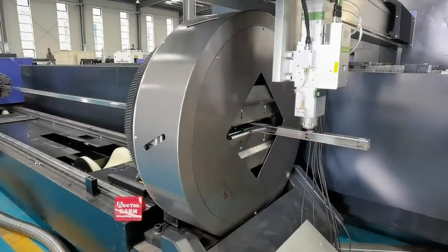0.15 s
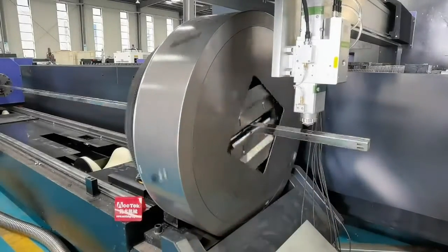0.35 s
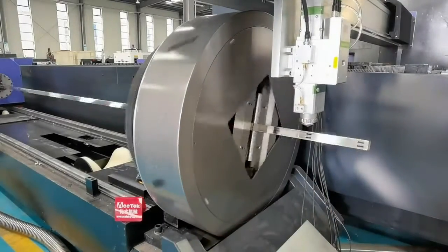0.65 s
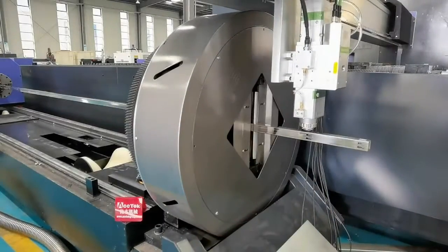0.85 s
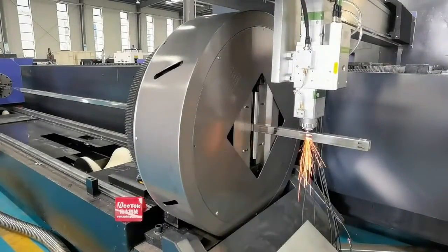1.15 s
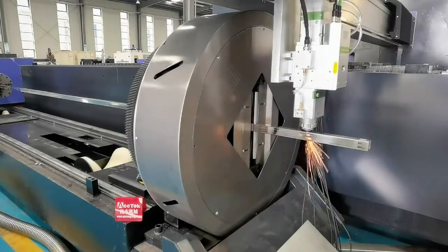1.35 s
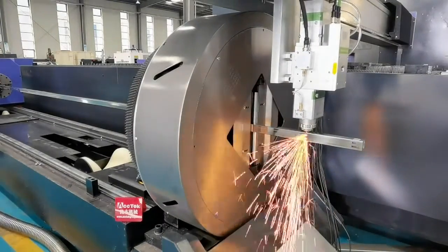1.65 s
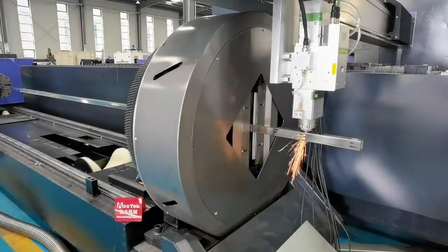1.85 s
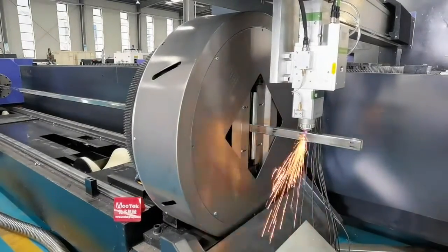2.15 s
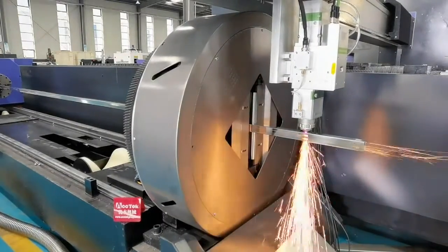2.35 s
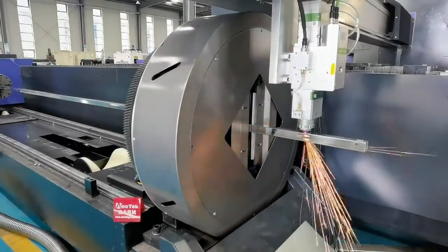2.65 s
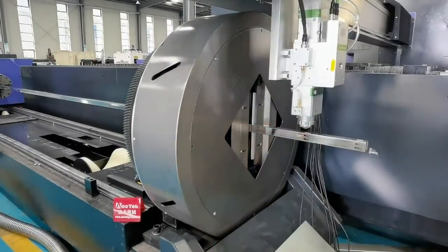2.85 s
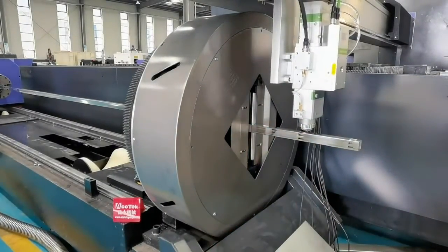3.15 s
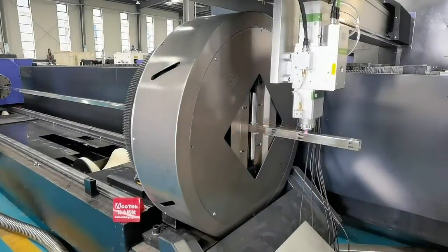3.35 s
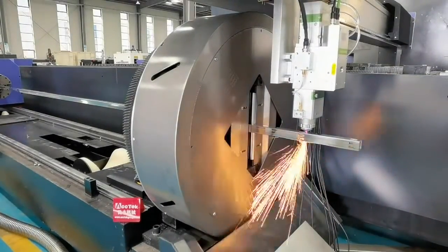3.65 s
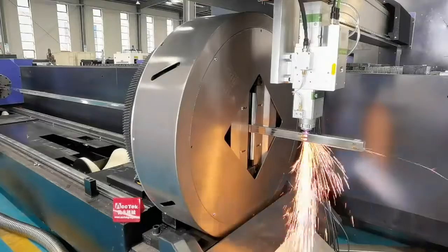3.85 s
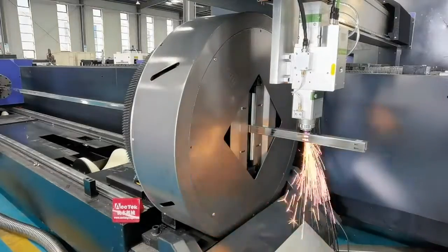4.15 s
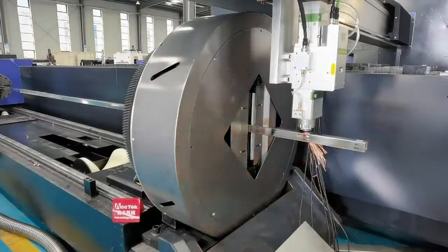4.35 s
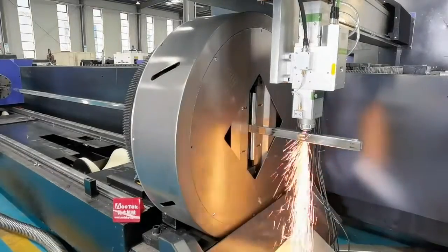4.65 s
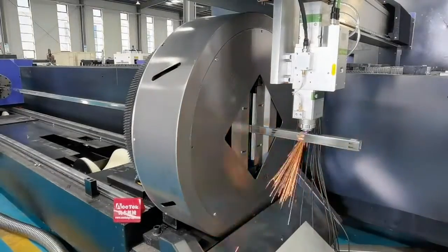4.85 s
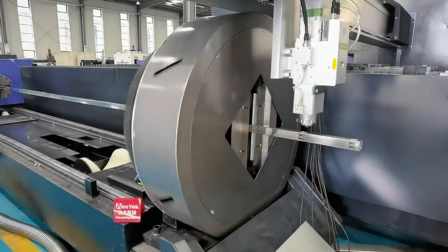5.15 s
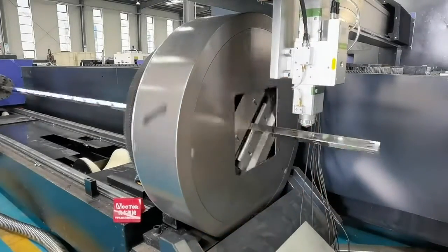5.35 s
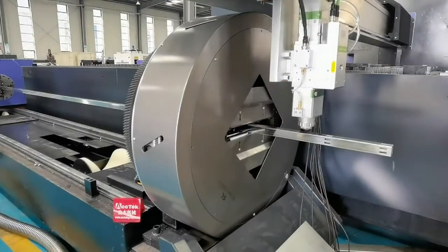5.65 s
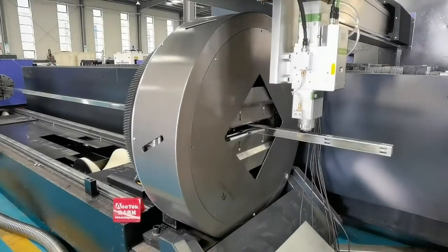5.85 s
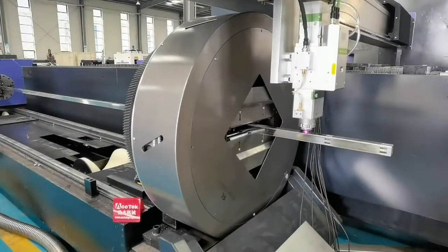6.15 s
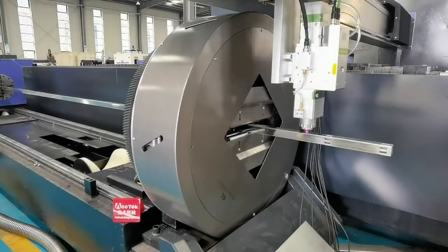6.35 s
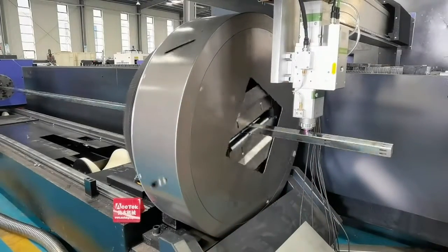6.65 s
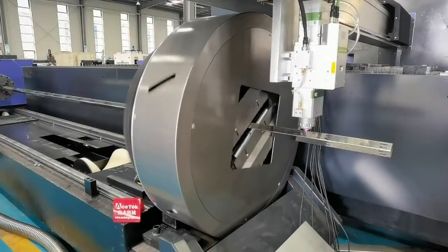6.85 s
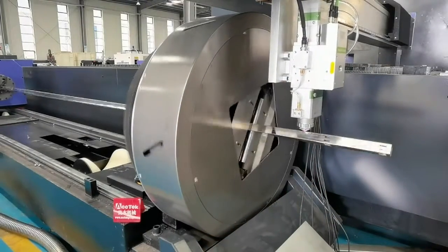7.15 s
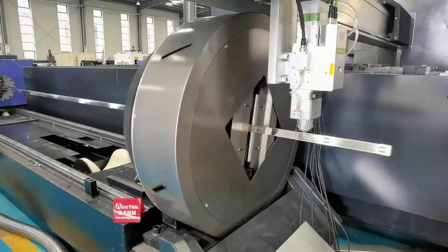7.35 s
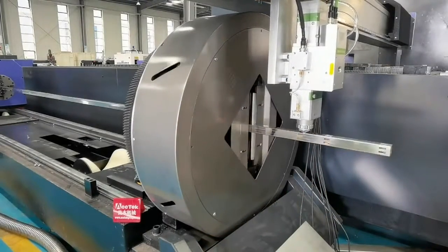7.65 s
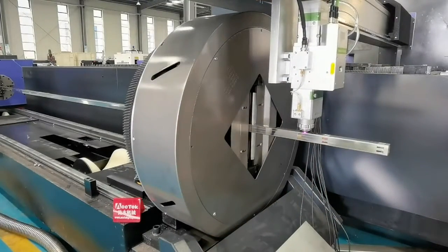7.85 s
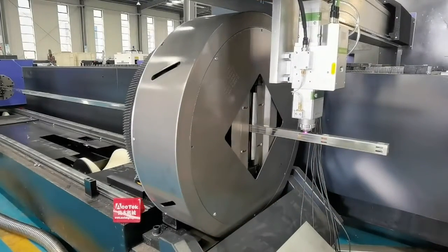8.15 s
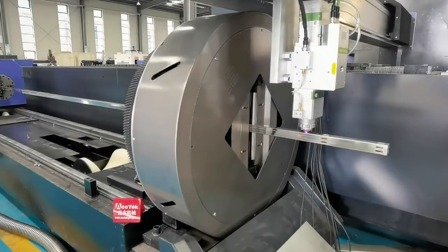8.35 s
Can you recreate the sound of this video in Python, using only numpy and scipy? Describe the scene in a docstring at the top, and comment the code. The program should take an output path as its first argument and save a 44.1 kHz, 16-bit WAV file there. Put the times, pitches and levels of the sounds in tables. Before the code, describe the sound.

A bright, forceful gas jet hisses near the microphone, with a thin whistle around 8 kHz, fine spark crackle and faint hollow tube resonance. From 0.1 to 0.6 seconds it flares harshly; a low drive hum around 130 Hz follows until about 0.9, when the gas chokes and returns with a soft knock. Small spurts come at 1.1 and 2.0. A stronger blast bursts at 2.7-3.0, then a short dip near 3.1. Rushing cutting noise continues from 3.5 to 4.9, with another sharp blast at 5.0-5.3. The drive hums at 5.3-5.7, the gas drops, knocks back at 5.8, dips again and spurts at 6.1. Steadier hiss follows over gear rumble, fluttering rapidly around 6.7-7.4 with quieter hums. A brief edge change comes at 7.5, then faint servo notes under the hiss until 8.5. The hall's low fan drone stays beneath.

```python
"""Laser cutting a steel tube

Assist gas hisses from the nozzle, flares and changes colour on edges and slots, whistles in the nozzle gap
and blows the hollow tube into resonance: coloured noise under level curves, with sparks as random clicks.
Between cuts the gas valve knocks (decaying noise in frame resonances) and the chuck's drive hums (harmonics)
as it turns the tube. Gears rumble, a drive sings late on, and the hall drones with a fan tone."""
import sys
import numpy as np
from scipy import signal
from scipy.fft import rfft, irfft, next_fast_len
from scipy.io import wavfile
from scipy.ndimage import uniform_filter1d, map_coordinates

SR = 44100
rng = np.random.default_rng(int(sys.argv[2]) if len(sys.argv) > 2 else 0)


def store_pcm(level_fs):
    """Save levels as 16-bit WAV."""
    pcm = np.round(np.clip(level_fs, -1, 1) * 32767).astype(np.int16)
    wavfile.write(sys.argv[1], SR, np.atleast_2d(pcm).T)


N = 374409

# spectrum of the free jet's hiss: f/Hz, density/dB
HISS_SPECTRUM = [(60, -90), (900, -39), (3500, -32), (4700, -17), (5400, -2), (5800, .5), (6300, 0),
                 (6750, 0.5), (7200, 3), (9000, 5), (9400, -2.5), (10000, 1), (10900, -2.5), (11600, -16.5),
                 (14000, -21)]
# spectrum of the rush on the cut edge: f/Hz, density/dB
EDGE_SPECTRUM = [(50, -72), (200, -30.5), (600, -24.5), (1000, -18), (1850, -13), (2200, -6.5),
                 (3000, -3.5), (3550, 0), (4050, -2.5), (4900, 2), (5400, 0.5), (6400, 0.5), (8000, -2),
                 (12000, -28)]
# resonances of the nozzle gap: f/Hz, width/Hz, level/dB
GAP_MODES = [(8366, 380, 18), (8660, 380, 5)]
TUBE_LEFT_S = 5.4  # the nozzle leaves the tube's opening
TUBE_LAG_S = 0.00005  # left-right lag of the tube's sound


def amp(db):
    """Decibels to gain."""
    return np.exp(np.log(10) / 20 * np.asarray(db))


def unit(x):
    """Scale to rms 1."""
    return x / np.sqrt(np.mean(x ** 2) + 1e-20)


def along(points, hz):
    """Interpolate (f/Hz, value) points on a log-frequency axis."""
    f, v = np.transpose(points)
    return np.interp(np.log(hz + 1), np.log(f + 1), v)


def clock():
    """Time of every sample in s."""
    return np.arange(N) / SR


def curves(rows):
    """One value per sample for each column after the time."""
    s, *columns = np.transpose(rows)
    return [np.interp(clock(), s, column) for column in columns]


def wobble(knots_per_s):
    """Smooth random curve: spline through normal random knots."""
    s = np.arange(0, N / SR, 1 / 2000)
    knots = rng.standard_normal(int(N * knots_per_s / SR) + 4)
    return np.interp(clock(), s, map_coordinates(knots, [s * knots_per_s]))


def gate(start, end, rise=.03, fall=.03):
    """Envelope of 1 between start and end, with straight ramps (s) centred on both."""
    opening = np.clip((clock() - start) / rise + .5, 0, 1)
    closing = np.clip((end - clock()) / fall + .5, 0, 1)
    return opening * closing


def burst(s, t60):
    """Envelope that rises within a millisecond at s and decays 60 dB per t60 (s)."""
    age = np.clip(clock() - s, 0, 1)
    decay = amp(np.maximum(-60 * age / t60, -160))
    return np.minimum(age / .001, 1) * decay


def filtered(x, response):
    """Apply a response of frequency to x."""
    m = next_fast_len(N + SR // 4)
    return irfft(rfft(x, m) * response(np.fft.rfftfreq(m, 1 / SR)), m)[..., :N]


def colour(points):
    """Response of a (f/Hz, level/dB) spectrum."""
    return lambda hz: amp(along(points, hz))


def resonances(modes, skirt=1.49):
    """Response of separately excited resonances, summed in power; skirt sets their steepness."""
    def response(hz):
        power = sum(amp(db) ** 2 / (1 + (2 * (hz - centre) / width) ** 2) ** skirt
                    for centre, width, db in modes)
        return np.sqrt(power)
    return response


def rush(response, lag_s=0.00019):
    """Stereo noise of rms 1; its shared part reaches the left microphone lag_s earlier."""
    # likeness of the two microphones: f/Hz, shared power/1
    likeness = [(60, 1), (300, 0.9), (700, 0.77), (1000, 0.5), (2300, 0.56), (4000, 0.42), (8000, 0.15),
                (15000, 0.1)]
    # balance of the two microphones: f/Hz, left minus right/dB
    balance = [(100, -3), (1500, -2), (2400, -6), (3000, -1), (3700, -2), (4500, 5.5), (5600, -7),
               (6700, 2.5), (7400, -1.5), (8350, 13.5), (9200, -2), (10400, 17), (12000, 2.5), (15000, 8.5)]
    m = 2 * next_fast_len(N // 2 + 1)
    hz = np.fft.rfftfreq(m, 1 / SR)
    noise = rng.standard_normal((3, 2 * len(hz))).view(complex)
    sides = np.array([[.5], [-.5]])
    alike = np.clip(along(likeness, hz), 0, 1)
    shared = np.sqrt(alike) * noise[0] * np.exp(2j * np.pi * hz * lag_s * sides)
    pair = shared + np.sqrt(1 - alike) * noise[1:]
    lean = amp(along(balance, hz) * sides)
    lean /= np.linalg.norm(lean, axis=0)  # same total power at every frequency
    return unit(irfft(pair * (lean * response(hz)), m)[:, :N])


def tone(hz, drift=0.00636, waver_db=2.5):
    """Machine tone of rms 1, slightly unsteady in pitch and level."""
    phase = 2 * np.pi * np.cumsum(hz * (1 + drift * wobble(10))) / SR
    return unit(amp(waver_db * wobble(8)) * np.sin(phase))


def panels(x, echo_db=-5.5, decay_s=0.0056, dull_hz=9000, count=120):
    """The machine's steel panels add a short cluster of dulled echoes, different at each microphone."""
    out = np.zeros_like(x)
    lowpass = signal.butter(1, min(dull_hz, SR / 3), fs=SR)
    for side in range(2):
        delays_s = rng.uniform(.0018, .028, count)
        strengths = rng.choice([-1, 1], count) * np.exp(-delays_s / decay_s)
        echoes = np.bincount((delays_s * SR).astype(int), strengths)
        response = signal.lfilter(*lowpass, amp(echo_db) * echoes / np.linalg.norm(echoes))
        response[0] = 1  # direct sound
        out[side] = signal.oaconvolve(x[side], response / np.linalg.norm(response))[:N]
    return out


def shimmer(x, patchy_db=1.6, band_size=3, frame_size=18):
    """Slowly shifting random narrow-band ripple in the noise's colour; sizes in bins, frames."""
    z = signal.stft(x, nperseg=512)[2]
    field = uniform_filter1d(rng.standard_normal(z.shape[1:]), band_size, 0)
    field = uniform_filter1d(field, frame_size, 1)
    rippled = signal.istft(z * amp(patchy_db * unit(field)), nperseg=512)[1][:, :N]
    return unit(rippled) * np.std(x)


def gas():
    """One jet drives hiss, edge rush with sparks, sizzle, gap whistle and the tube's air column."""
    # slow course of the jet: t/s, strength/dB, edge rush relative to it/dB
    jet_course = [(0, -16, -10.5), (0.42, -20.5, -10.5), (0.72, -24, -9.5), (1.05, -22.5, -10),
                  (1.4, -23, -6), (1.87, -20.5, -7.5), (2.25, -22, -10.5), (2.55, -20.5, -8.5),
                  (3.35, -16.5, -12), (3.62, -19.5, -7), (3.9, -16, -8), (4.55, -15.5, -14),
                  (4.87, -17.5, -13), (5.45, -18.5, -9), (6, -18, -18), (6.5, -18, -12), (7.4, -17.5, -13),
                  (8.49, -18.5, -12)]
    # sizzle spectrum: f/Hz, density/dB
    sizzle_spectrum = [(100, -84), (4000, -15), (8000, 9), (11000, 3.5), (12000, 1), (13500, 0.5),
                       (15200, 2), (16000, 0)]
    # air column of the tube: f/Hz, width/Hz, level/dB
    tube_modes = [(2200, 300, -4), (2504, 350, -4), (3400, 190, -8.5)]
    hiss_re_jet_db, edge_offset_db, whistle_re_jet_db = -5, -1, -7.5
    sizzle_base_db, sizzle_db_per_jet_db = -20, .45
    tube_base_db, tube_db_per_edge_db, tube_left_db = -25, 0.52, -12.5
    away_whistle_db, away_sizzle_db = -2, 0.5  # changes away from the tube's opening

    jet_db, on_edge_db = curves(jet_course)
    hiss_flare_db, edge_flare_db, whistle_flare_db, sizzle_flare_db = flares()
    supply_db = throttle() + flutter()
    flow_db = jet_db + supply_db
    edge_db = flow_db + on_edge_db + edge_flare_db
    away = gate(TUBE_LEFT_S, np.inf, rise=0.3)

    hiss_db = hiss_re_jet_db + flow_db + hiss_flare_db + 0.18 * wobble(30)
    rush_db = edge_offset_db + edge_db + 0.94 * wobble(70)
    sizzle_db = sizzle_base_db + sizzle_db_per_jet_db * jet_db + supply_db + sizzle_flare_db
    sizzle_db = sizzle_db + away_sizzle_db * away
    whistle_db = whistle_re_jet_db + flow_db + whistle_flare_db
    whistle_db = whistle_db + away_whistle_db * away + 0.36 * wobble(25)
    tube_db = tube_base_db + tube_db_per_edge_db * edge_db + tube_left_db * away + 1.6 * wobble(13)

    hiss = amp(hiss_db) * rush(colour(HISS_SPECTRUM))
    edge = amp(rush_db) * rush(colour(EDGE_SPECTRUM))
    sizzle = amp(sizzle_db) * rush(colour(sizzle_spectrum))
    whistle = amp(whistle_db) * rush(resonances(GAP_MODES))
    tube = amp(tube_db) * rush(resonances(tube_modes), lag_s=TUBE_LAG_S)
    return hiss + edge + sizzle + whistle + tube + sparks(edge_db)


def flutter():
    """Gas gain in dB: runs of dips as the nozzle hunts for its height, over quick turbulence."""
    # runs of dips: first dip t/s, last dip t/s, period/s, depth/dB
    dip_runs = [(6.68, 6.955, 0.0538, -4), (7.193, 7.4, 0.068, -4.5)]
    dip_s = 0.014  # half width at 1/e of the depth
    t = clock()
    db = 0.38 * wobble(45) + .5 * wobble(260) + 0.48 * wobble(9)
    for first, last, period, depth_db in dip_runs:
        on = (t > first - period / 2) & (t < last + period / 2)
        offset = (t[on] - first + period / 2) % period - period / 2
        db[on] += depth_db * np.exp(-(offset / dip_s) ** 2)
    return db


def sparks(edge_db, per_second=300, spark_db=-9):
    """Droplets blown off the cut edge make tiny cracks, stronger as the edge rush grows."""
    hits = rng.random(N) < per_second / SR
    sizes = rng.uniform(-1.03, 1, (2, N))
    crack_colour = lambda hz: colour(HISS_SPECTRUM)(hz) + colour(EDGE_SPECTRUM)(hz)
    return unit(filtered(hits * sizes, crack_colour)) * amp(edge_db + spark_db)


def flares():
    """Gain in dB of hiss, edge, whistle, sizzle as the jet spills over edges; it never falls below 0."""
    # flares: start/s, end/s, release/s, hiss/dB, edge/dB, whistle/dB, sizzle/dB
    blasts = [(0.129, 0.442, 0.079, 7, 8.5, 5, 5.5), (0.42, 0.635, 0.056, 3, 6, 9.5, 10.5),
              (0.714, 0.847, 0.077, -3, -1, 3, 5), (1.916, 2.2, .08, 3, -0.5, 8.5, 0),
              (2.731, 3.03, 0.27, 8, 8.5, 6.5, 6), (4.992, 5.332, .16, 6.5, 5.5, 3.5, 3),
              (5.117, 5.254, 0.085, 6.3, 10.5, 6.5, 7), (5.28, 5.62, .1, -1, 1.5, 2, 1.5),
              (7.457, 7.714, .02, -0.9, 3, -2, -4)]
    attack_s = .014
    sag_db_per_s, brighten_db_per_s = 4, 15  # hiss and edge sink, sizzle grows
    slopes = [-sag_db_per_s, -sag_db_per_s, 0, brighten_db_per_s]
    gains = np.zeros((4, N))
    for start, end, release, *levels in blasts:
        envelope = gate(start, end, rise=attack_s, fall=release)
        on = envelope > 0
        drift = np.outer(slopes, clock()[on] - start)
        flare_db = envelope[on] * (np.array(levels)[:, None] + drift)
        gains[:, on] = np.maximum(gains[:, on], flare_db)
    return gains


def throttle():
    """Gas supply gain in dB: bleeds away between cuts, jumps back as the valve reopens, then refills."""
    # throttlings: start/s, reopening/s, depth/dB
    chokes = [(0.787, 0.923, -16.5), (3.08, 3.18, -5), (5.652, 5.801, -15), (6.037, 6.292, -7.5)]
    refill_share, refill_s = 0.51, 0.071  # part of the dB drop left at reopening, its time constant
    t, db = clock(), np.zeros(N)
    for start, reopen, depth_db in chokes:
        bleed = np.clip((t - start) / (reopen - start), 0, 1) ** 1.2
        refill = refill_share * np.exp(-np.minimum(np.abs(t - reopen) / refill_s, 20))
        db += depth_db * np.where(t < reopen, bleed, refill)
    return db


def hoot():
    """The tube's bore sounds like a blown pipe, wavering, whenever gas enters it: narrow-band noise."""
    # bore resonance: f/Hz, width/Hz, level/dB
    bore_modes = [(1186, 62, 0)]
    # gas entering the bore: start/s, end/s, level/dB
    hoots = [(-0.2, 5.42, -49.5), (0.18, 0.6, -45.5), (2.45, 2.87, -45.5), (3.53, 3.72, -44.5),
             (5.08, 5.4, -48), (5.85, 6.33, -56)]
    power = sum((amp(db) * gate(start, end, rise=.09, fall=0.055)) ** 2 for start, end, db in hoots)
    return np.sqrt(power) * amp(1.2 * wobble(12)) * rush(resonances(bore_modes), lag_s=TUBE_LAG_S)


def chuck(gear_db=-3.5, rough_db=2.4):
    """Gears of feed axis and chuck rumble as noise; the drive hums in unsteady harmonics during turns."""
    # feed axis pushing the tube forward: start/s, end/s, level/dB
    feeds = [(-0.2, 1.32, -63.5), (2.93, 3.3, -61), (5.75, 8.7, -57.5)]
    # turns: start/s, end/s, drive pitch f/Hz, level/dB, overtones/dB
    turns = [(0.361, 0.843, 133, -53, -0.5), (5.253, 5.692, 132.7, -48, 0), (6.722, 7.162, 112, -60.5, -16),
             (7.269, 7.437, 112.8, -54, -15)]
    # drive harmonics: multiple/1, level/dB
    harmonics = [(1, 0.5), (2, -10.5), (3, -5.5), (4, -8), (5, -11), (6, -7.5)]
    # gear rumble spectrum: f/Hz, density/dB
    gear_spectrum = [(25, -35), (60, -16), (90, -4.5), (125, 2.5), (185, 0), (260, -8.5), (400, -11),
                     (900, -10.5), (3000, -70)]
    hum = np.zeros(N)
    effort = sum(amp(db) * gate(start, end, rise=.12, fall=.12) for start, end, db in feeds)
    speed = 1 + 0.0108 * wobble(40)
    strengths = [amp(level + rough_db * wobble(45)) for _, level in harmonics]
    for start, end, hz, db, overtone_db in turns:
        envelope = amp(db) * gate(start, end, rise=.04, fall=0.23)
        on = envelope > 0
        phase = 2 * np.pi * np.cumsum(hz * speed[on]) / SR
        for order, (multiple, _) in enumerate(harmonics):
            partial = np.sqrt(2) * np.sin(round(multiple) * phase + rng.uniform(0, 2 * np.pi))
            strength = strengths[order][on] * amp(overtone_db * (order > 0))
            hum[on] += envelope[on] * strength * partial
        effort = effort + amp(gear_db) * envelope
    stereo_hum = hum * amp([[-1.2], [1.2]])  # left, right
    return stereo_hum + effort * rush(colour(gear_spectrum), lag_s=0)


def hall():
    """Extraction fans: low, uneven noise drone and a faint blade tone."""
    # drone spectrum: f/Hz, density/dB
    drone_spectrum = [(20, -42), (45, -30), (70, -11), (110, -10), (170, 0.5), (270, 1), (370, -0.5),
                      (520, 1.5), (720, -6), (1000, -3), (1400, -4.5), (2200, -6), (5000, -17.5),
                      (12000, -50)]
    # drone course: t/s, level/dB
    drone_course = [(0, -47.5), (2.7, -48), (3.4, -52), (4.2, -52), (4.6, -48.5), (6.7, -51), (8.49, -51.5)]
    fan_hz, fan_db = 355, -65.5
    drone = shimmer(rush(colour(drone_spectrum), lag_s=0), patchy_db=2, band_size=2, frame_size=20)
    drone_db = curves(drone_course)[0] + 0.39 * wobble(6)
    return amp(drone_db) * drone + amp(fan_db) * tone(fan_hz)


def slot_and_tube_tones():
    """Narrow noise bands, partly different at each microphone: edge tones over slots, a tube resonance."""
    # bands: start/s, end/s, f/Hz, width of each filter pass/Hz, level/dB
    tone_bands = [(0.129, 0.416, 6300, 400, -35), (0.2, 0.589, 3430, 330, -37.5),
                  (0.201, 0.57, 2320, 700, -37.5), (0.95, 1.9, 2140, 260, -43), (0.97, 1.9, 3530, 130, -49),
                  (2.739, 2.978, 6250, 259.2, -28), (2.741, 2.888, 5000, 260, -26.5),
                  (2.737, 2.976, 3590, 260, -37.5), (3.721, 4.703, 5650, 864, -31.5),
                  (5.107, 5.23, 2500, 600, -34), (5.103, 5.24, 6200, 230, -31),
                  (7.499, 7.71, 2640, 140, -44), (7.598, 7.714, 5800, 450, -29)]
    out = np.zeros((2, N))
    for start, end, hz, width, db in tone_bands:
        envelope = gate(start, end)
        on = envelope > 0
        noise = rng.standard_normal(on.sum()) + rng.standard_normal((2, on.sum()))
        b, a = signal.iirpeak(hz, hz / width, SR)
        band = signal.lfilter(b, a, signal.lfilter(b, a, noise))
        out[:, on] += amp(db) * envelope[on] * unit(band)
    return out


def spits():
    """Short bright spurts of gas as the valve opens or the jet breaks through the steel: decaying noise."""
    # spurts: t/s, level/dB, t60/s
    spurts = [(0.925, -29, .06), (1.114, -17, 0.046), (1.974, -11, .04), (5.002, -14, .04),
              (6.119, -13, 0.066)]
    envelope = sum(amp(db) * burst(s, t60) for s, db, t60 in spurts)
    return envelope * rush(lambda hz: colour(HISS_SPECTRUM)(hz) + resonances(GAP_MODES)(hz))


def knocks():
    """Gas valve and carriage knock: dull thuds, decaying noise in the frame's resonances."""
    # knocks: t/s, level/dB
    thuds = [(0.925, -43), (2.73, -51), (3.18, -45), (5.615, -41), (5.8, -41)]
    frame = resonances([(215, 34, 6), (360, 100, 0), (540, 120, -24)])  # f/Hz, width/Hz, level/dB
    return sum(amp(db) * burst(s, t60=0.22) for s, db in thuds) * rush(frame, lag_s=0)


def servo():
    """A drive sings during the last feed: thin notes of narrow-band noise."""
    # notes: f/Hz, width/Hz, level/dB
    notes = [(186, 14, -1), (261, 14, -3), (1125, 120, -8), (1346, 70, -7), (1760, 330, -8)]
    start_s, level_db = 7.45, -54
    return amp(level_db) * gate(start_s, np.inf, rise=.1) * rush(resonances(notes), lag_s=0)


def scene():
    """Gas and sparks at the nozzle, the machine and the hall around them."""
    nozzle = shimmer(panels(gas() + slot_and_tube_tones()), patchy_db=1.5)
    return nozzle + hoot() + spits() + knocks() + chuck() + servo() + hall()


def record(dry):
    """Round off the highest peaks, thin the deep bass and keep nothing above the band limit."""
    ceiling, low_cut_hz, top_hz = .92, 42, 15800
    rounded = dry / (1 + (dry / ceiling) ** 8) ** (1 / 8)
    return filtered(rounded, lambda hz: hz ** 2 / np.hypot(hz ** 2, low_cut_hz ** 2) * (hz < top_hz))


dry = scene()
out = record(dry)
store_pcm(out)
```